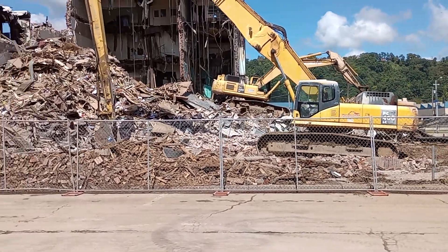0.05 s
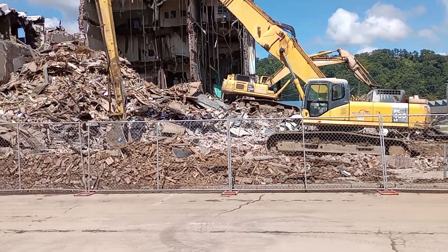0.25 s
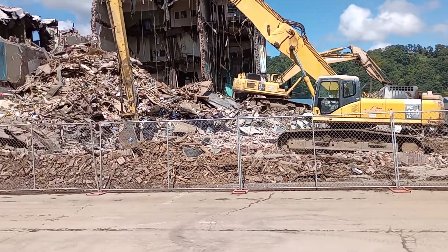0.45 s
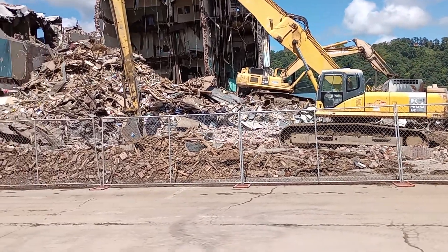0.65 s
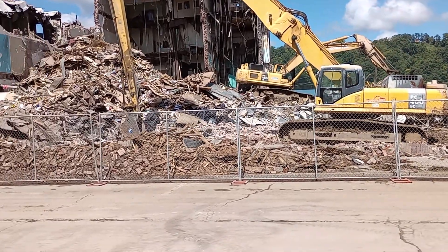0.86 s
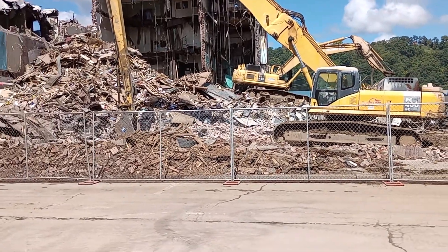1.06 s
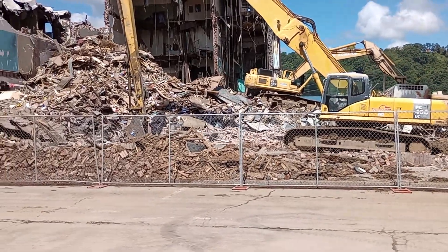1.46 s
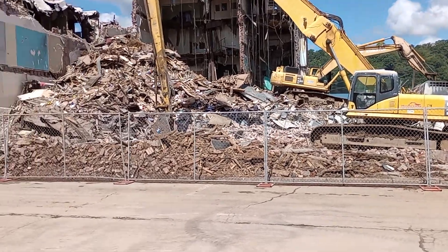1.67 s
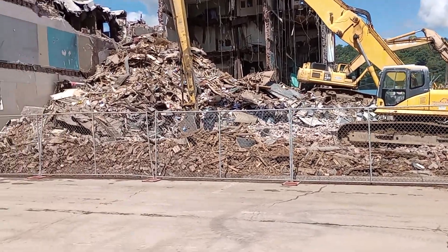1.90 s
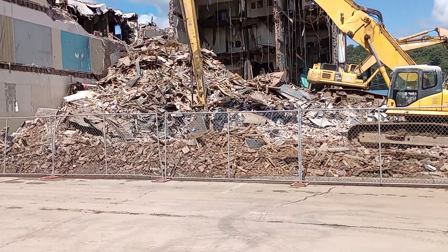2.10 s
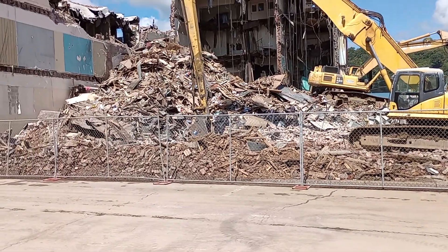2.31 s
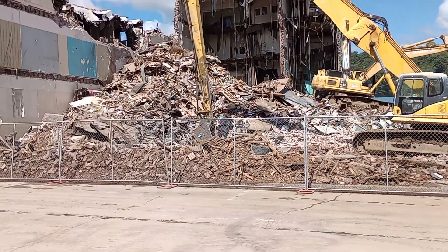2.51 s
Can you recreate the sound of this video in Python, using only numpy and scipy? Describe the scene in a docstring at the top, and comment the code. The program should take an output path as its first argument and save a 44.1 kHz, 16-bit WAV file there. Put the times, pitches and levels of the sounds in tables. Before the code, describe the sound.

Demolition debris spills down, building to a heavy crash at about 0.4 seconds, with a metal sheet ringing until rubble smothers it near 0.8. From 1.2 to 2.6 seconds, dragged rubble tumbles with dull knocks, while steel clinks and scrapes on the right with a faint, thin squeal. An excavator's diesel drones underneath, swelling from 1.7 seconds. The open lot adds a faint rumble and a short echo.

```python
"""An excavator pulls debris off a half-demolished building, heard across an open lot.
First, grit and chunks spill down, each piece ringing briefly. Near 0.4 s a heavy load crashes, and
a metal sheet rings until rubble buries it. From 1.2 s rubble is dragged and tumbles, with dull knocks,
while steel clinks, scrapes and squeals. All along a diesel drones, and the ruin echoes the debris."""
import sys
import numpy as np
from scipy import signal
from scipy.fft import rfft, irfft
from scipy.io import wavfile
from scipy.ndimage import uniform_filter1d

SR = 44100
rng = np.random.default_rng(int(sys.argv[2]) if len(sys.argv) > 2 else 0)


def wav_out(sig):
    """Save sig, one row per channel (or a flat mono array), as 16-bit PCM at SR to the path in sys.argv[1]."""
    wavfile.write(sys.argv[1], SR, np.round(np.clip(np.atleast_2d(sig).T, -1, 1) * 32767).astype(np.int16))


N = 116865
T = np.arange(N) / SR

# The load lands in two heaps, then settles. Each row: start, rise time and hold time in seconds,
# then the levels of slabs, blocks, chips and grit in dB.
LANDINGS = [(.429, 0.0056, 0.067, -31, -22.5, -21.5, -26), (0.523, 0.017, 0.044, -34, -22.5, -20.5, -26.5),
            (0.647, 0.02, 0.014, -39, -30, -24, -35.5), (0.742, 0.028, 0.032, -58, -40, -39, -45.5)]
# The tone of the crash. Each row: frequency in Hz, level in dB.
CRASH_TONE = [(29, -36), (50, -27), (79, -26), (124, -4), (204, -15), (285, -12), (399, -10), (449, -1),
              (506, -16.5), (544, -6), (724, -8), (987, -10), (1480, -19.5), (1750, -15), (2570, -19.5),
              (5910, -25.5), (10000, -42), (15000, -63)]
DUST_HZ, DUST_T60_S = 8750, 0.35  # a "t60" is a fade time: how long a sound takes to drop 60 dB

def crash():
    """Each heap lands in a dense burst of pieces that dulls as the finest grit dies away first."""
    gains = []
    for k, (*_, t60) in enumerate(RUBBLE_SIZES):
        heaps = [undb(levels[k]) * ramp(start, rise) * release(start + hold, t60)
                 for start, rise, hold, *levels in LANDINGS]
        gains.append(np.max(heaps, axis=0))
    burst = rubble(gains, CRASH_TONE, lean=1.25)
    coarse = signal.sosfiltfilt(signal.butter(4, DUST_HZ, fs=SR, output="sos"), burst)
    return coarse + (burst - coarse) * release(LANDINGS[1][0], DUST_T60_S)

# The notes of the falling metal sheet. Each row: pitch in Hz, level in dB, fade time in seconds.
SHEET_NOTES = [(451.4, -16, 0.64), (345, -21.5, 0.53), (398, -28.5, 0.79), (549.7, -18, 0.38),
               (632, -27, 0.73), (720, -31, 0.59), (930, -34, .32), (972, -24, 0.72), (1092, -29.5, 0.93),
               (2050, -40, 0.3)]
SHEET_START_S, SHEET_BURIED_S = 0.48, 0.79

def sheet():
    """A metal sheet rings, jolted by falling pieces, until rubble covers and damps it."""
    out = 0
    for hz, db, t60 in SHEET_NOTES:
        shaken = 1 + .7 * (jolts(per_s=60) + 1j * jolts(per_s=60))  # shakes both level and phase
        note = np.array([np.imag(shaken * np.exp(2j * np.pi * hz * (T - lag))) for lag in (.0005, 0)])
        out = out + undb(db) * note * fade(SHEET_START_S, t60)
    return out * ramp(SHEET_START_S, rise=0.084) * release(SHEET_BURIED_S, t60=.25)

# The first spill. Each row: time in seconds, then the levels of slabs, blocks, chips and grit in dB.
SPILL_FLOW = [(0, -51, -68, -72, -69), (.08, -44, -57, -56.5, -59.5), (.135, -48, -50, -45.5, -42),
              (.2, -51, -45, -34, -37.5), (.245, -34, -31.5, -34, -35.5), (.33, -37.5, -32.5, -35.5, -44),
              (.42, -71, -36.5, -42.5, -46.5), (.48, -63, -63, -70, -33.5)]
# The tone of the spill. Each row: frequency in Hz, level in dB.
SPILL_TONE = [(29, -32), (50, -2), (124, 4), (200, -14), (418, -3.5), (471, -13), (797, -7), (1200, -10.5),
              (1630, -11), (5910, -15.5), (15000, -42.5)]

def spill():
    """Grit and chunks shower down just ahead of the crash."""
    return rubble(flow(SPILL_FLOW), SPILL_TONE, lean=1.0)

# Dragged rubble. Each row: time in seconds, then the levels of slabs, blocks, chips and grit in dB.
DRAG_FLOW = [(1.235, -66, -63, -67, -73), (1.255, -56, -60, -57, -50.5), (1.31, -50, -46.5, -44.5, -43),
             (1.39, -50, -49, -42, -49.5), (1.44, -40.5, -37, -42, -51.5), (1.52, -78, -37, -35.5, -45),
             (1.59, -39, -35.5, -41, -48.5), (1.675, -41, -37, -43.5, -56), (1.72, -38, -48, -39.5, -47.5),
             (1.87, -49, -40, -38.5, -41.5), (1.955, -51, -34, -35.5, -43), (2.04, -44, -68, -39.5, -40),
             (2.12, -37.5, -51, -42, -46.5), (2.165, -43.5, -50, -54.5, -54), (2.215, -52, -50, -47.5, -63),
             (2.26, -54, -45.5, -42.5, -44), (2.375, -37.5, -38.5, -37.5, -37),
             (2.44, -49, -56, -42, -48.5), (2.49, -58, -89, -46, -69), (2.56, -59, -52.5, -49, -78),
             (2.65, -63, -55, -49, -63)]
# The tone of the dragged rubble. Each row: frequency in Hz, level in dB.
DRAG_TONE = [(29, -51), (50, -9), (81, -15), (130, -3), (169, -5.5), (266, -8), (307, 0), (518, -16.5),
             (598, -6), (742, -10.5), (1000, -14.5), (1220, -15.5), (1380, -9.5), (1590, -8.5),
             (2960, -13.5), (4440, -21.5), (4890, -24), (5910, -18), (8260, -42), (9310, -42), (15000, -77)]
# The bucket's plates. Each row: pitch in Hz, level in dB, fade time in seconds before stretching.
BUCKET_NOTES = [(301, -4, .1), (448, -8, .12), (602, -7, .1), (1230, -3, .14), (1550, -1, .07),
                (1880, -3, .12), (2060, -6, .2), (2310, -5, .16), (2420, -3, .1), (2580, -5, .12),
                (2800, -7, .18), (3400, -8, .12)]
LURCH_DB, TUMBLE_DB, BUCKET_DB = 1.3, -2, -5

def drag():
    """Rubble tumbles in fits ahead of the bucket, and its chips shake the plates."""
    lurch = undb(LURCH_DB * jolts(per_s=45))
    gains = [gain * lurch for gain in flow(DRAG_FLOW)]
    shaking = filtered(noise(), 3, 4200, "low")
    plates = undb(BUCKET_DB) * resonate(shaking, BUCKET_NOTES, stretch=1.14) * gains[2]
    return undb(TUMBLE_DB) * rubble(gains, DRAG_TONE, lean=1.5) + plates * pan(-1.4)

# Slabs, blocks, chips and grit. Each row: lowest and highest pitch in Hz, pieces per second, typical
# ring length in cycles, level scatter in dB, left over right in dB (times lean), crash t60 in seconds.
RUBBLE_SIZES = [(55.2, 186, 340, 8.5, 0, 0.5, 0.47), (190.6, 750, 900, 29, 1.5, 2.6, 0.69),
                (756.7, 3293, 4000, 38.3, 3, -2, 0.69), (3294, 14000, 6500, 93, 0, -4, 0.5)]

def rubble(gains, tone, lean):
    """Showers of all four sizes mix, each with its own gain; lean scales how far to the side they sit."""
    showers = [gain * unit(colour(pieces(*size[:5]), tone)) * pan(lean * size[5])
               for gain, size in zip(gains, RUBBLE_SIZES)]
    return bounce(sum(showers))

def pieces(low_hz, high_hz, per_s, cycles, scatter_db):
    """A steady shower of pieces, each ringing briefly at its own pitch, few large and many small."""
    out = np.zeros((2, 2 * N))
    draws = np.random.default_rng(rng.integers(2 ** 31)).random((int(per_s * N / SR), 6))
    for when, pitch, size, length, *phases in draws:
        hz = low_hz * (high_hz / low_hz) ** pitch
        t60 = cycles * (.5 + length) / hz
        t, first = T[:int(t60 * SR) + 2], int(when * N)
        gain = hz * undb(-scatter_db * np.log(max(size, .01)))
        shape = (1 - np.exp(-4 * hz * t)) * np.exp(-np.log(1000) * t / t60)
        note = np.sin(2 * np.pi * (hz * t + np.array(phases)[:, None]))
        out[:, first:first + len(t)] += gain * shape * note
    return widen(out[:, :N])

# Lumps of concrete and timber landing. Each row: start in seconds, level in dB, pitch in Hz,
# fade time in seconds, level of the crack in dB compared with the body of the knock.
LUMPS = [(.185, -33.5, 795, 0.23, -1), (.371, -21, 1530, 0.046, -12), (.429, -20.5, 1110, 0.042, 4),
         (0.437, -24.5, 198, .14, -3), (.463, -26, 118, 0.068, -17), (.468, -16.5, 870, 0.078, -3),
         (.543, -15, 294, 0.072, -24), (0.537, -26, 124, .13, -8), (.553, -18, 2046, 0.054, -12),
         (.562, -25, 965, 0.064, -13), (.578, -23, 1666, 0.074, -3), (0.663, -27, 112, .11, -30),
         (.666, -27.5, 219, 0.071, -18), (.708, -30.5, 341, 0.11, -28.5), (1.41, -44.5, 715, 0.35, -22),
         (1.415, -39, 260, 0.17, -26), (1.481, -27.5, 1195, .17, -6), (1.579, -32, 309, 0.18, -20),
         (1.592, -29.5, 1692, .09, -20), (1.6, -37, 986, 0.25, -25), (1.667, -25.5, 312, 0.19, -29),
         (1.712, -32.5, 415, 0.17, -9), (1.778, -34.5, 447, 0.11, -36), (1.839, -32.5, 311, 0.094, -24),
         (1.927, -27.5, 377, 0.083, -16), (1.945, -30, 304, .12, -20), (1.949, -37, 608.6, 0.24, -18),
         (2.067, -39.5, 427, 0.2, -24), (2.24, -42.5, 710, 0.37, -20), (2.298, -34, 664.4, 0.28, -22),
         (2.367, -32, 582, 0.14, -22), (2.372, -36, 239, .14, -24), (2.408, -39, 595, 0.099, -20),
         (2.412, -37, 450, 0.11, -24), (2.474, -35, 1366, 0.1, -12)]
# The tone of the crack. Each row: frequency in Hz, level in dB.
CRACK_TONE = [(150, -55), (600, 1.5), (3000, -7.5), (6500, -7), (10000, -19), (15000, -78)]

def knocks():
    """Each lump gives a crack, a damped note and a cluster of close resonances round it."""
    out, rattle, crack = 0, noise(), unit(colour(noise(), CRACK_TONE))
    for start, db, hz, t60, crack_db in LUMPS:
        spread = 1 + min(9.8 / t60 / hz, .3)  # shorter knocks cover a wider band
        cluster = unit(filtered(rattle, 2, [hz / spread, hz * spread], "band"))
        body = (cluster + np.sin(2 * np.pi * hz * (T - start))) * strike(start, .003, t60)
        snap = undb(crack_db) * crack * strike(start, .003, t60=0.065)
        out = out + undb(db) * (body + snap)
    return out

# The notes steel scrap shares, before tuning and stretching.
# Each row: pitch in Hz, level in dB, fade time in seconds.
STEEL_NOTES = [(3360, -9, .12), (3775, -11, .14), (3965, -10, .14), (4430, -7, .07), (4570, 7, .17),
               (5420, -8, .1), (5785, -4, .11), (6420, -6, .11), (7000, -10, .06), (8010, -15, .13),
               (8980, -14, .11), (9530, -18, .22), (10440, -20, .1)]
# Steel hitting steel. Each row: start in seconds, level in dB, the scrap's own pitch in Hz, its level
# in dB, tuning factor of the shared notes, stretch of the ring time, chatter fade time in seconds.
STEEL_HITS = [(1.246, -42, 9540, -9, 1, 1.9, 0.27), (1.247, -45, 2800, 2, 1, 0.91, 0.073),
              (1.252, -49.5, 5650, 0, .99, 2.6, 0.11), (1.482, -33.5, 6050, -1, .97, 0.3, 0.21),
              (1.565, -53, 11030, -1, 1.05, 1.1, 0.1), (1.69, -42, 3430, 5, 1, 0.64, 0.044),
              (1.86, -35, 7550, -5, 1.04, 0.71, 0.059), (2.004, -22.5, 6510, 0, 1.02, 0.18, 0.076),
              (2.036, -35.5, 6120, 5.5, 1.05, 0.4, .04), (2.216, -42.5, 9450, -9, 1, .66, .05),
              (2.2948, -23, 5787, -36, 1, 0.86, 0.11), (2.328, -35, 6250, -2, 1.08, 0.53, 0.044),
              (2.366, -31.5, 5700, -8, .99, 0.42, 0.014), (2.473, -24, 4430, -2.5, 1.09, 0.29, 0.11)]
# The tone of the chatter. Each row: frequency in Hz, level in dB.
CHATTER_TONE = [(1000, -18), (3000, -5), (4300, 7.5), (7000, 5.5), (8200, 0), (11000, 0), (12500, -21),
                (15000, -20)]
CONTACT_OCTAVES, SHARED_DB, CHATTER_DB, STEEL_PAN_DB = 0.74, -3, -5, -6.5

def clinks():
    """Steel scraps to the right chatter at each contact and ring on, each at its own pitch."""
    out, chatter = 0, colour(noise(), CHATTER_TONE)
    for start, db, own_hz, own_db, tuning, stretch, chatter_t60 in STEEL_HITS:
        # A hit favours the notes near the scrap's own pitch.
        favour = [(hz, -6 * (np.log2(hz / own_hz) / CONTACT_OCTAVES) ** 2) for hz, _, _ in STEEL_NOTES]
        shared = sum(undb(note_db + favour_db) * ring(start, hz * tuning, t60 * stretch)
                     for (hz, note_db, t60), (_, favour_db) in zip(STEEL_NOTES, favour))
        own = undb(own_db) * ring(start, own_hz, 0.17 * stretch)
        ringing = (undb(SHARED_DB) * shared + own) * ramp(start, rise=.0015)
        contact = undb(CHATTER_DB) * unit(colour(chatter, favour)) * strike(start, .0015, chatter_t60)
        out = out + undb(db) * (ringing + contact)
    return out * pan(STEEL_PAN_DB)

# Steel sliding on steel between the blows. Each row: time in seconds, level in dB.
SCRAPE_LEVELS = [(1.24, -69), (1.26, -54), (1.42, -64), (1.52, -51.5), (1.65, -64), (1.72, -52.5),
                 (1.87, -47), (2.06, -51), (2.13, -63), (2.21, -57), (2.25, -42), (2.285, -42.5),
                 (2.31, -36), (2.36, -44.5), (2.44, -47), (2.5, -51), (2.56, -65)]
# The pieces that slide. Each row: tuning factor for the steel notes, level in dB.
SLIDING_PIECES = [(.994, 0), (1.07, -9), (.84, -10)]
GRIP_DB, SLIPS_PER_S = 4, 66

def scrape():
    """Uneven sticking and slipping sets three pieces of steel singing."""
    out, rub = 0, filtered(noise(), 6, 11000, "low")
    for tuning, db in SLIDING_PIECES:
        friction = rub * undb(GRIP_DB * jolts(SLIPS_PER_S))
        notes = [(hz * tuning, note_db, t60) for hz, note_db, t60 in STEEL_NOTES]
        out = out + undb(db) * resonate(friction, notes, stretch=2.6)
    return unit(out) * flow(SCRAPE_LEVELS)[0] * pan(STEEL_PAN_DB)

# A thin, high squeal. Each row: time in seconds, level in dB.
SQUEAL_LEVELS = [(1.68, -70), (1.74, -66), (1.95, -68), (2.12, -67), (2.22, -77), (2.5, -78), (2.62, -65.5)]
# Its note. The one row: pitch in Hz, level in dB, fade time in seconds before stretching.
SQUEAL_NOTE = [(9420, 0, 0.059)]

def squeal():
    """Steel rubbing under load sings in one narrow, flickering band."""
    return resonate(noise(), SQUEAL_NOTE, stretch=0.84) * flow(SQUEAL_LEVELS)[0]

# The exhaust's notes. Each row: multiple of the firing rate, level in dB.
EXHAUST_NOTES = [(2, -5), (3, 5.5), (4, -4), (6, -17)]
# How hard the engine works. Each row: time in seconds, level in dB.
ENGINE_EFFORT = [(0, -51.5), (.9, -55.5), (1.2, -70), (1.62, -59), (1.74, -35), (1.87, -49), (2.1, -35.5),
                 (2.25, -51), (2.39, -38.5), (2.52, -48.5), (2.65, -47)]
FIRING_HZ = 46.15

def diesel():
    """The exhaust drones at a slightly unsteady speed, louder under load."""
    def wander():
        return unit(uniform_filter1d(uniform_filter1d(rng.standard_normal(N), 2500), 2500))
    phase = 2 * np.pi * np.cumsum(FIRING_HZ * (1 + 0.0078 * wander())) / SR
    drone = sum(undb(db + 0.81 * wander()) * np.sin(k * phase) for k, db in EXHAUST_NOTES)
    return unit(drone) * undb(np.interp(T, *np.array(ENGINE_EFFORT).T))

def bounce(x):
    """Quick reflections off the ground and the machine give the rubble a ragged tone."""
    tail = filtered(noise() * fade(0, t60=0.033), 2, 900, "high")
    gain = undb(-2.5)
    return (x + gain * reflect(x, tail)) / np.sqrt(1 + gain ** 2 / 2)

# The tone of the echo. Each row: frequency in Hz, level in dB.
ECHO_TONE = [(60, -1.5), (400, 0.5), (3000, -2), (7000, -3.5), (10000, -7), (14000, -19.5)]

def echo(x):
    """Many reflections from the ruin and the heap blur into a short tail."""
    tail = colour(noise(), ECHO_TONE) * fade(0.008, t60=0.42)
    return undb(-10.5) * reflect(x, tail)

# The tone of the site's background. Each row: frequency in Hz, level in dB.
SITE_TONE = [(15, -43), (25, -13), (49, -32), (95, -5), (121, -8.5), (264, -16.5), (301, -19), (450, -14.5),
             (515, -17), (833, -17), (903, -21.5), (3180, -27.5), (15000, -58)]

def site():
    """A faint, steady rumble fills the lot."""
    return undb(-49.5) * unit(colour(noise(), SITE_TONE))

# How alike left and right sound. Each row: frequency in Hz, likeness (1 is the same, 0 unrelated).
STEREO_LIKENESS = [(60, 1), (150, 0.89), (330, 0.86), (470, 0.67), (650, -0.069), (1100, 0.071),
                   (1700, 0.43), (2400, 0.22), (3800, 0.064), (9000, 0.12)]

def widen(pair):
    """Two unrelated signals become one wide sound, with left and right most alike in the bass."""
    alike = np.clip(on_bins(STEREO_LIKENESS), -.99, .99)
    mid, side = irfft(rfft(pair, 2 * len(alike) - 2) * np.sqrt([1 + alike, 1 - alike]))[:, :N]
    return np.array([mid + side, mid - side]) / np.sqrt(2)

def from_right(x):
    """The treble of the direct sound reaches the left side a little later."""
    hz = np.fft.rfftfreq(N, 1 / SR)
    lag_s = .00021 * np.clip(hz / 2500, 0, 1) ** 2
    return np.array([irfft(rfft(x[0]) * np.exp(-2j * np.pi * hz * lag_s), N), x[1]])

def undb(db):
    """Turn decibels into a gain."""
    return 10 ** (np.asarray(db) / 20)

def unit(x):
    """Scale to an average power of 1."""
    return x / np.sqrt(np.mean(x ** 2) + 1e-20)

def noise():
    """Stereo white noise."""
    return widen(rng.standard_normal((2, N)))

def pan(db):
    """Left and right gains; negative dB leans right."""
    return undb(np.array([[db], [-db]]) / 2)

def jolts(per_s):
    """Random values joined by straight lines."""
    return np.interp(T * per_s, np.arange(1000), rng.standard_normal(1000))

def ramp(start, rise):
    """A straight climb from 0 to 1."""
    return np.clip((T - start) / rise, 0, 1)

def release(start, t60):
    """Full level until start, then dying away."""
    return np.exp(-np.log(1000) * np.maximum(T - start, 0) / t60)

def fade(start, t60):
    """A sudden start that dies away."""
    return (T >= start) * release(start, t60)

def strike(start, rise, t60):
    """A rounded start that dies away."""
    return np.sin(np.pi / 2 * ramp(start, rise)) ** 2 * fade(start, t60)

def ring(start, hz, t60):
    """One struck note."""
    return fade(start, t60) * np.sin(2 * np.pi * hz * (T - start))

def flow(table):
    """A gain over time for each level column, faded at both ends."""
    times, *levels = np.array(table).T
    ends = ramp(times[0] - .01, rise=.01) * np.exp(-10 * np.maximum(T - times[-1], 0))
    return [undb(np.interp(T, times, db)) * ends for db in levels]

def on_bins(points):
    """Spread (Hz, value) rows along the frequency axis."""
    hz, value = np.array(points, float).T
    return np.interp(np.log(np.fft.rfftfreq(2 ** 17, 1 / SR) + 1), np.log(hz), value)

def colour(x, tone):
    """Filter x to follow a table of (Hz, dB) rows."""
    cepstrum = irfft(np.log(undb(on_bins(tone))))
    size = len(cepstrum)
    cepstrum[1:size // 2] *= 2  # folded so that nothing rings before its cause
    cepstrum[size // 2 + 1:] = 0
    return irfft(rfft(x, size) * np.exp(rfft(cepstrum)))[..., :N]

def filtered(x, order, hz, keep):
    """Keep the lows, the highs or a band."""
    return signal.sosfilt(signal.butter(order, hz, keep, fs=SR, output="sos"), x)

def resonate(x, notes, stretch):
    """Let x set a table of notes ringing; stretch multiplies their fade times."""
    out = 0
    for hz, db, t60 in notes:
        decay = np.exp(-np.log(1000) / (t60 * stretch * SR))
        feedback = [1, -2 * decay * np.cos(2 * np.pi * hz / SR), decay * decay]
        out = out + undb(db) * np.sqrt(1 - decay) * signal.lfilter([1, 0, -1], feedback, x)
    return unit(out)

def reflect(x, tail):
    """Smear x through a tail of reflections."""
    return signal.fftconvolve(x, unit(tail) / np.sqrt(N), axes=1)[:, :N]

def scene():
    """Debris, steel and their echo over the engine and the site's background."""
    debris = spill() + crash() + sheet() + drag() + knocks()
    steel = clinks() + scrape() + squeal()
    echoes = echo(debris + undb(-19) * steel)  # the scrap lies nearer than the heap, so echoes less
    return from_right(debris + steel) + echoes + diesel() + site()

def record(dry):
    """Thin the deep bass and cut the highest treble."""
    thin = filtered(dry, 2, 45, "high")
    return signal.sosfilt(signal.ellip(8, .2, 70, 15700, fs=SR, output="sos"), thin)

dry = scene()
out = record(dry)
wav_out(out)
```